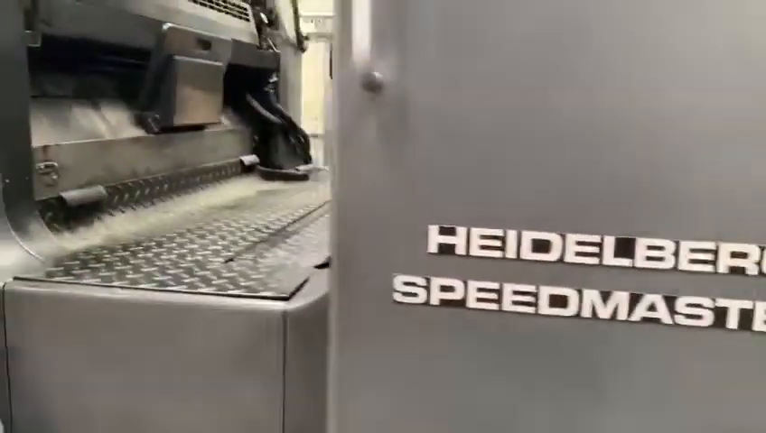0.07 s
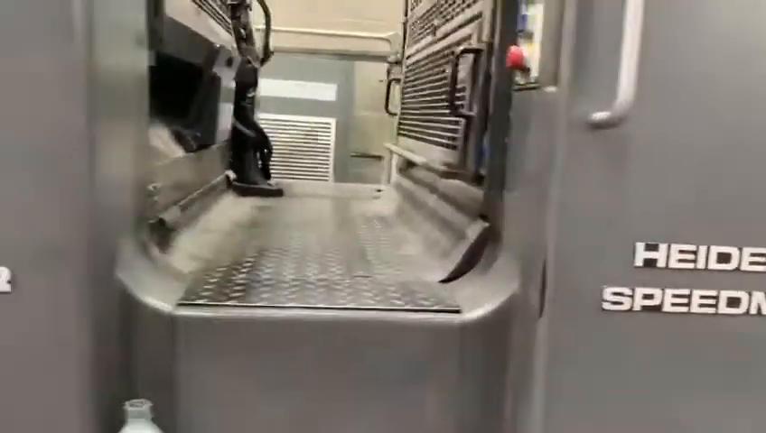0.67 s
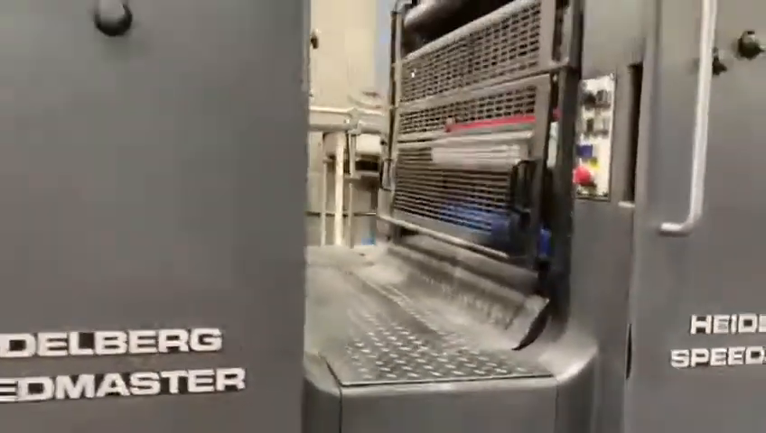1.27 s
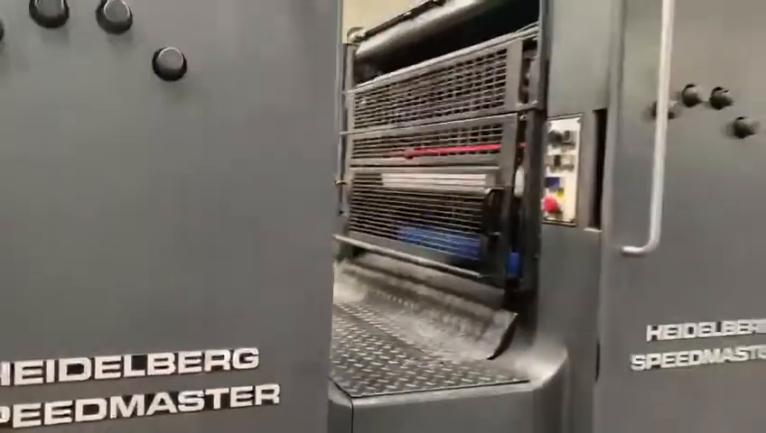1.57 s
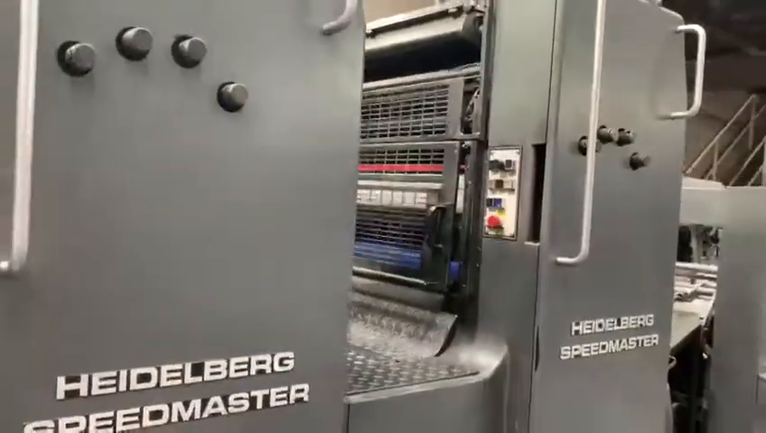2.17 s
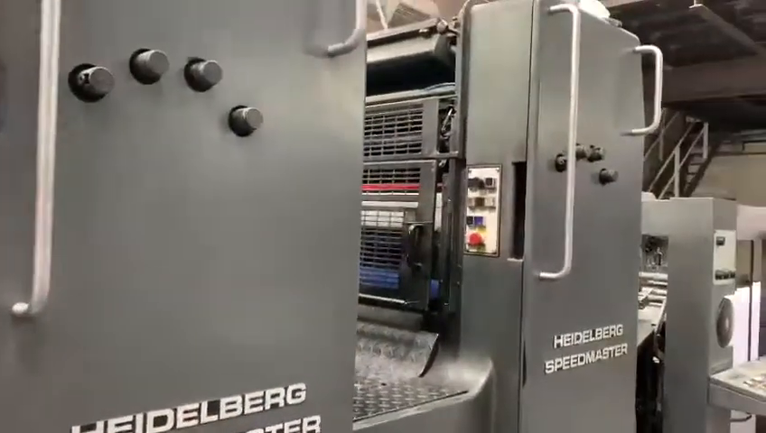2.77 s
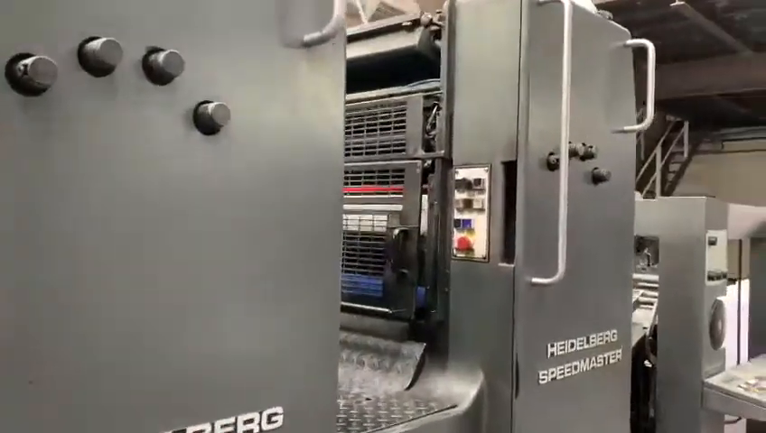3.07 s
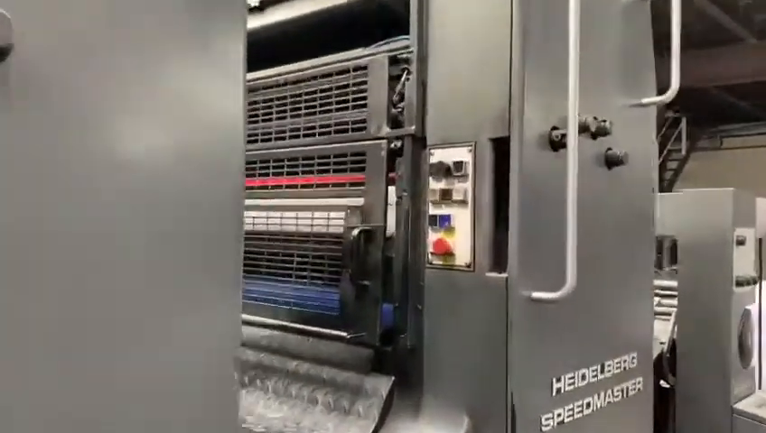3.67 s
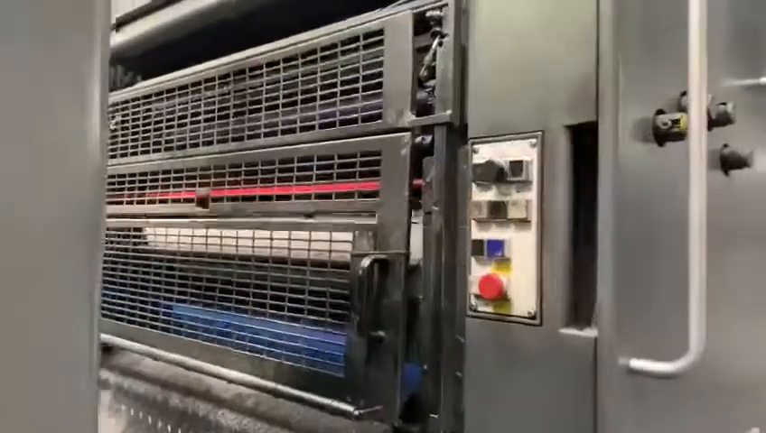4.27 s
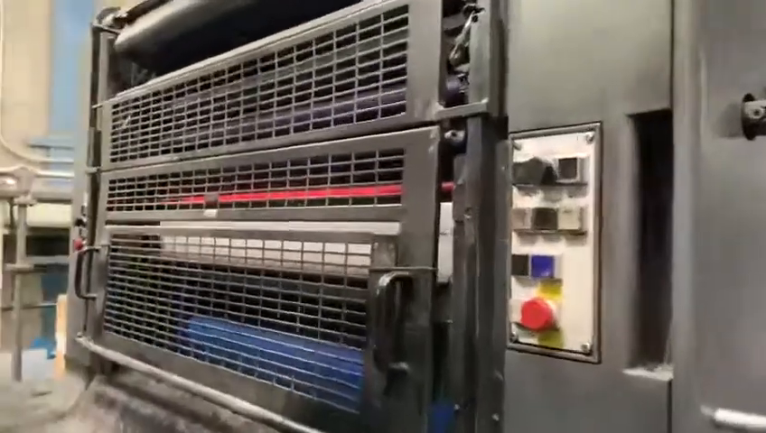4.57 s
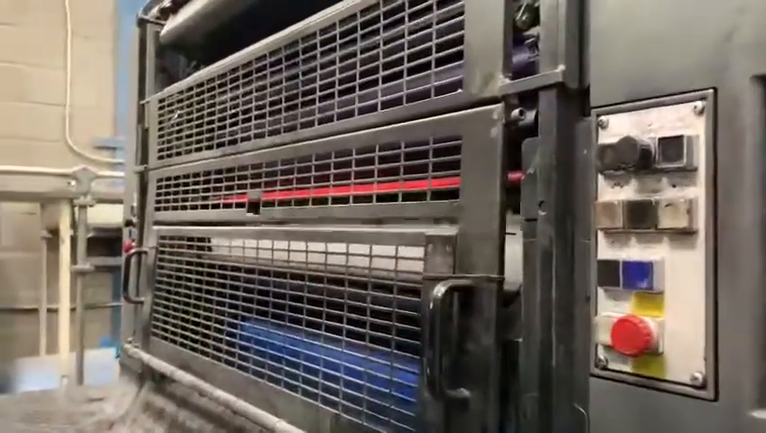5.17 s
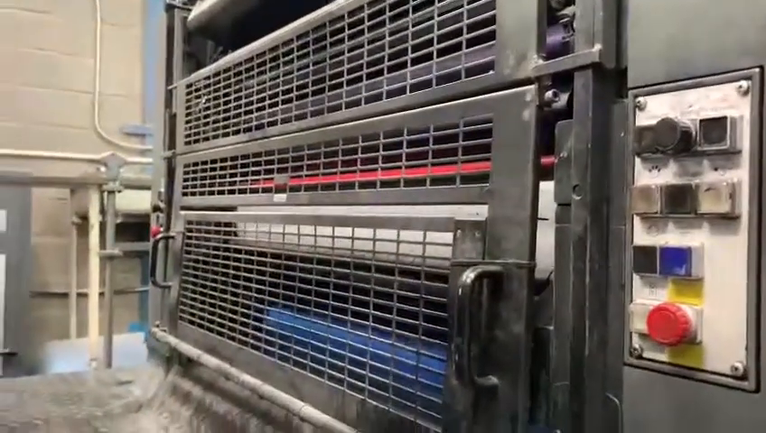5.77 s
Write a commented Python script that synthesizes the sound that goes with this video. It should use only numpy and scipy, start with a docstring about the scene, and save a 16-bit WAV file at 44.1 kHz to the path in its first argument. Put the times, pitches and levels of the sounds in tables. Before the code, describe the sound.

A large sheet-fed printing press runs in an industrial hall with a steady low roar, motor hum and hissing rollers. A little over twice a second it thumps, spits air and snaps, with metal clanks, light ticks and a faint high whine mixed in. The beat is subdued at first. As the microphone moves up to the guard, the booms, clanks and crisp snaps become much louder and clearer.

```python
"""A sheet-fed offset press runs in a hall, heard on a walk up to the guard of one printing unit.
With every sheet, a little over twice a second, a valve spits, the grippers snap and the cylinder gaps
boom; a cam lever clanks through its round every second sheet. Underneath, frame and gears roar, drive
teeth whine, inked rollers hiss and chain links tick. The side covers screen the moving parts, so these
grow louder as the open guard comes into view."""
import sys
import numpy as np
from scipy import signal
from scipy.fft import rfft, irfft, next_fast_len
from scipy.io import wavfile
from scipy.ndimage import uniform_filter1d, map_coordinates

SR = 44100
rng = np.random.default_rng(int(sys.argv[2]) if len(sys.argv) > 2 else 0)


def put_to_file(sound):
    """Save the sound as 16-bit audio at rate SR, in the file named by the first command-line argument."""
    columns = np.atleast_2d(sound).T  # one column per channel
    safe = np.clip(columns, -1, 1)
    whole_steps = np.round(safe * 32767)
    wavfile.write(sys.argv[1], SR, whole_steps.astype(np.int16))


N = 265482
TIME_S = np.arange(N) / SR

SHEET_PERIOD_S, FIRST_SNAP_S = .45, .2375
MESH_HZ, RATTLE_HZ = 170.85, 220
ROAR_GAIN_DB, WHINE_GAIN_DB, SNAP_GAIN_DB = 3, -.5, .5
RING_GAIN_DB, SCRAPE_GAIN_DB, HALL_GAIN_DB = 2.3, 1.7, -15
LOW_CUT_HZ, TOP_HZ = 42, 11900

# Noise spectra: freq_hz, density_db
RUMBLE_SPECTRUM = [(18, -36), (32, -32), (48, -7), (60, -6), (92, 1.5), (125, 2.5), (160, 1.5), (195, 3),
                   (240, 1.5), (300, 0.5), (380, -9.5), (600, -118)]
ROAR_SPECTRUM = [(180, -5.5), (350, -0.5), (480, -1.5), (650, -3.5), (900, -4.5), (1250, -9.5), (1600, -10),
                 (2100, -12), (2800, -17), (4500, -89)]
HISS_SPECTRUM = [(1400, -40), (2400, 5.5), (2850, 10), (3200, 11.5), (4500, 8.5), (5500, 4.5), (6700, 5.5),
                 (7300, 13), (7800, -52), (12000, -51)]
FIZZ_SPECTRUM = [(4000, -25), (5600, -8), (6600, -2.5), (7600, -.5), (8500, 0), (9700, 0), (10500, .5),
                 (11550, -1), (11900, -12)]
SNAP_SPECTRUM = [(2000, -18), (5000, 3.5), (7200, 11.5), (8500, 13.5), (10500, 19.5), (12000, 7)]
# Left-right likeness: freq_hz, correlation (clipped to +-1 in use)
EAR_CORRELATION = [(60, 0.99), (130, 0.97), (280, 0.8), (590, 0.11), (1100, 0.02), (1550, -0.34),
                   (2200, 0.075), (3000, -0.16), (4500, 0.19), (5400, -0.083), (6600, 0.15), (7600, -1.8)]
# Stereo balance: freq_hz, left_minus_right_db
BALANCE = [(60, -.6), (130, -.2), (250, 1), (500, 2.2), (1000, .3), (3000, .3), (5000, -1.1), (7500, 0)]
# Phase of the direct treble: freq_hz, right_lead_rad
EAR_LEAD = [(5500, -.7), (6700, .1), (7300, 1.3), (7850, 2.9), (9100, 3.35), (9600, 4.6), (10300, 6.1),
            (12000, 6.4)]
# Hall decay: freq_hz, t60_s
HALL_DECAY = [(150, 0.53), (2000, 0.15), (10000, 0.092)]
# Sound let past the covers, 0 at the guard: time_s, gain_db
EXPOSURE = [(0, -16.5), (.8, -13), (2, -15), (3.4, -13.5), (3.95, -9), (4.3, -7.5), (4.8, -2), (6.02, 0)]
# Gear roar and gear drone along the walk: time_s, level_db
ROAR_LEVELS = [(0.0, -33.5), (0.07, -32), (2.75, -30.5), (6.02, -27)]
DRONE_LEVELS = [(0, -38), (.64, -46), (.75, -31.5), (1, -31), (1.14, -42), (1.3, -36), (1.45, -41),
                (1.6, -35), (1.76, -54), (2.15, -46), (2.4, -37), (2.85, -42), (3.15, -36), (3.65, -37),
                (3.85, -54), (5, -35), (5.3, -42)]
# Swells of the strongest whine: peak_s, length_s, level_db
SQUEALS = [(1.32, .09, -52.5), (2.34, .12, -47), (2.46, .06, -50), (2.94, .09, -51.5), (3.09, .08, -52.5),
           (3.24, .1, -51.5), (3.53, .12, -46), (3.68, .08, -53), (4.97, .16, -51), (5.17, .1, -54),
           (5.65, .09, -47), (5.92, .11, -49.5)]
# Weaker whines: mesh_order, unused_db, level_db
WHINES = [(18, -65, -60), (19, -67, -65), (21, -64, -64), (22, -63, -61.5), (23, -66, -64), (30, -68, -65),
          (38, -65, -58.5), (39, -65, -58)]
# Motor and blower tones: pitch_hz, level_db, exposure_share
HUMS = [(49, -53, 0), (155.7, -37, 0.16), (242.5, -38.5, 0.12), (501, -44, 0.34), (1958, -50.5, 0.36)]
# Light strokes per sheet: after_snap_s, centre_hz, width_hz, level_db, rise_s, t60_s
STROKES = [(-.06, 3420, 3200, -44, .02, .3), (-.045, 814, 1100, -29, .02, 0.28),
           (.066, 2210, 2580, -37, .0015, 0.032), (0.146, 4000, 2420, -36, 0.02, 0.12),
           (0.168, 700, 800, -31.5, 0.0096, .2), (.268, 600, 800, -28.5, .004, 0.17)]
# Cam knocks per sheet: after_snap_s, pitch_hz, level_db, swell_s, exposure_share
CAM_THUDS = [(-.008, 150, -28, .006, .15), (.058, 220, -28, .004, 0), (.074, 98, -26, .009, .2),
             (.114, 225, -25, .005, 0), (.165, 225, -28, .007, .2), (.172, 88, -27, .016, .3),
             (.324, 160, -23.5, .007, .2)]
# Frame and lever modes: pitch_hz, level_db, t60_s
FRAME_MODES = [(97, 0, .15), (155, 0, .16), (213, -2, .16), (230, 0, .15), (246.5, 0, .18), (272, -4, .12)]
LEVER_MODES = [(505, 0, .15), (665, -1, .12), (835, -2, .12), (921, -3, .1), (1040, -3, .1), (1160, -3, .1),
               (1430, 0, .13), (1525, -1, .12), (1750, -6, .08), (1938, 2, .19), (1975, -12, .12),
               (2220, -9, .1)]
# Blows on the frame: start_s, level_db, centre_hz
FRAME_BOOMS = [(.288, -22, 155), (.314, -19, 247), (.738, -22, 155), (.764, -17.5, 258), (1.207, -18, 230),
               (1.659, -14.5, 229), (2.135, -19.5, 232), (2.587, -15, 232), (3.035, -22, 245),
               (3.49, -16, 245), (3.902, -19.5, 232), (4.35, -13, 231), (4.808, -11, 247),
               (4.907, -17.5, 97), (5.253, -15, 97), (5.264, -8.3, 247), (5.352, -21, 97), (5.705, -16, 97),
               (5.709, -9, 246), (5.802, -15.5, 97), (5.823, -17, 155)]
# Lever's rubbing contacts per two-sheet round: after_snap_s, level_db, centre_hz
LEVER_RUBS = [(-.012, -24, 680), (.027, -23.5, 560), (.065, -29, 1200), (.18, -24.5, 850),
              (.51, -27.5, 950), (.67, -30, 1300)]
# Lever hitting its stop or the frame: start_s, level_db, centre_hz, ring_offset_db
LEVER_KNOCKS = [(.246, -38, 1450, 3), (.408, -28, 600, -4), (2.048, -37, 1500, 10), (2.46, -30, 650, -4),
                (2.944, -37, 1460, 10), (4.018, -26, 640, -4), (4.205, -34.5, 1450, 5),
                (4.722, -27, 620, -5), (4.745, -24, 600, -5), (4.748, -27.5, 1800, 0),
                (4.753, -32, 1430, 8), (4.802, -31, 1180, 6), (4.94, -28.5, 1100, -2),
                (5.255, -28.5, 1020, 3), (5.59, -28, 950, -4), (5.622, -24.5, 950, -2),
                (5.637, -28, 1560, -1), (5.64, -31, 1940, 9), (5.648, -25, 850, -4),
                (5.665, -21.5, 560, -5)]
# Gripper snaps, one per sheet: level_db
SNAP_LEVELS_DB = [-39, -34, -35, -35, -37, -33, -37.5, -35, -27.5, -27.5, -24.3, -23.2, -23]


def amp(db):
    """Decibels to gain."""
    return 10 ** (np.asarray(db) / 20)


def unit(x):
    """Scale to rms 1."""
    return x / np.sqrt(np.mean(x ** 2) + 1e-20)


def along(points, hz):
    """Interpolate (freq_hz, value) points on a log axis."""
    knots_hz, values = np.transpose(points)
    return np.interp(np.log(hz + 1), np.log(knots_hz + 1), values)


def curve(points, time_s=TIME_S):
    """Interpolate (time_s, value) points."""
    return np.interp(time_s, *np.transpose(points))


def cover_db(share, time_s=TIME_S):
    """Screening by the covers; sound that bends round them follows only a share of it."""
    return share * curve(EXPOSURE, time_s)


def wobble(rate_hz):
    """Smooth random curve, rate_hz knots a second."""
    return map_coordinates(rng.standard_normal(int(N * rate_hz / SR) + 4), [TIME_S * rate_hz])


def add(track, start_s, sound):
    """Mix a sound into a stereo track."""
    start = round(start_s * SR)
    track[:, start:start + sound.shape[1]] += sound[:, :N - start]


def filtered(x, response):
    """Apply a frequency response."""
    size = next_fast_len(N + 8192)
    return irfft(rfft(x, size) * response(np.fft.rfftfreq(size, 1 / SR)), size)[..., :N]


def shape(spectrum):
    """Response of a spectrum table."""
    return lambda hz: amp(along(spectrum, hz))


def resonance(centre_hz, width_hz):
    """Response of one steep-skirted resonance."""
    return lambda hz: (hz * width_hz) ** 2 / ((centre_hz ** 2 - hz ** 2) ** 2 + (hz * width_hz) ** 2)


def ear_angle_rad(hz):
    """Left-right correlation as an angle; 0 is mono."""
    return np.arccos(np.clip(along(EAR_CORRELATION, hz), -1, 1))


def spread(pair, colour):
    """Two unrelated signals to a coloured stereo field, near mono in the bass; rms 1."""
    def response(hz):
        turn_rad = ear_angle_rad(hz) / 2
        return colour(hz) * np.array([np.cos(turn_rad), np.sin(turn_rad)])
    mid, side = filtered(pair, response)
    return unit(np.array([mid + side, mid - side]))


def rush(colour):
    """Coloured stereo noise; rms 1."""
    return spread(rng.standard_normal((2, N)), colour)


def patchy(colour, depth_db=2.1):
    """Grainy noise: narrow bands flare and fade at random; rms 1."""
    spectra = signal.stft(rng.standard_normal((2, N)), nperseg=1024)[2]
    patches = uniform_filter1d(rng.standard_normal(spectra.shape[1:]), size=5, axis=0)
    patches = uniform_filter1d(patches, size=4, axis=1)
    pair = signal.istft(spectra * amp(depth_db * unit(patches)), nperseg=1024)[1]
    return spread(pair[:, :N], colour)


def direct(x, colour):
    """Direct sound, phase-shifted between the ears; rms 1."""
    sides = np.array([[-.5], [.5]])
    return unit(filtered(x, lambda hz: colour(hz) * np.exp(1j * along(EAR_LEAD, hz) * sides)))


def tone(hz, drift_s, flutter_db):
    """Machine tone wandering at each ear in the hall's standing waves; rms 1."""
    phase = 2 * np.pi * hz * (TIME_S + drift_s)
    offset = .2 * ear_angle_rad(hz) * wobble(2.11)
    ears = [np.sin(phase + side * offset) * amp(flutter_db * wobble(5.5)) for side in (1, -1)]
    return unit(np.array(ears))


def beats(after_snap_s, level_db, share, sheets=1):
    """(start_s, level_db) of a slightly uneven blow, once per round of sheets."""
    period_s = sheets * SHEET_PERIOD_S
    starts_s = np.arange(FIRST_SNAP_S - period_s, N / SR, period_s) + after_snap_s
    starts_s = starts_s[(starts_s > 0) & (starts_s < N / SR)]
    scatter_db = .7 * rng.uniform(-1, 1, len(starts_s))
    return list(zip(starts_s, level_db + cover_db(share, starts_s) + scatter_db))


def blows(events, rise_s, t60_s):
    """Power-summed envelope of (start_s, level_db) blows."""
    t = np.arange(SR // 2) / SR
    blow = (1 - np.exp(-t / rise_s)) * amp(-60 * t / t60_s)
    blow /= blow.max()
    return np.sqrt(sum(np.interp(TIME_S - s, t, amp(db) * blow, left=0, right=0) ** 2
                       for s, db in events))


def favouring(modes, centre_hz, db_per_octave):
    """Modes as a blow excites them: weaker away from centre_hz."""
    return [(hz, db - db_per_octave * abs(np.log2(hz / centre_hz)), t60_s) for hz, db, t60_s in modes]


def ring(modes, scatter_db, rise_s):
    """Struck metal: decaying modes with random strengths and per-ear phases."""
    t = np.arange(SR // 2) / SR
    out, power = np.zeros((2, len(t))), 0
    for hz, db, t60_s in modes:
        gain = amp(db + scatter_db * rng.standard_normal())
        phase = rng.uniform(0, 2 * np.pi) + .45 * ear_angle_rad(hz) * rng.standard_normal((2, 1))
        out += gain * np.sin(2 * np.pi * hz * t + phase) * amp(-60 * t / t60_s)
        power += gain ** 2 / 2
    return out * (1 - np.exp(-t / rise_s)) / np.sqrt(power)


def hall(x):
    """Diffuse reverberation, dying faster in the treble."""
    hz, t, spectra = signal.stft(rng.standard_normal((2, SR)), SR, nperseg=256)
    decay = amp(-60 * t / along(HALL_DECAY, hz)[:, None])
    tail = signal.istft(spectra * decay, SR, nperseg=256)[1]
    return signal.fftconvolve(x, tail / np.linalg.norm(tail[0]), axes=1)[:, :N]


def frame_rumble(repeat_share=.25):
    """The frame rumbles; part of the power repeats with each cylinder turn."""
    turn = rng.standard_normal((2, round(SHEET_PERIOD_S * SR)))
    repeating = np.sqrt(repeat_share) * turn[:, np.arange(N) % turn.shape[1]]
    fresh = np.sqrt(1 - repeat_share) * rng.standard_normal((2, N))
    return amp(-25.5 + cover_db(.31)) * spread(repeating + fresh, shape(RUMBLE_SPECTRUM))


def gear_roar():
    """The gear train roars, nearer with each step."""
    level_db = ROAR_GAIN_DB + curve(ROAR_LEVELS) + .7 * wobble(40)
    return amp(level_db) * patchy(shape(ROAR_SPECTRUM))


def roller_hiss():
    """Rollers hiss, roughened by bearings and chains."""
    level_db = -36 + cover_db(.18) + wobble(28)
    roughness = unit(amp(1.2 * wobble(RATTLE_HZ)))
    return amp(level_db) * roughness * patchy(shape(HISS_SPECTRUM))


def ink_fizz():
    """Tacky ink splits between the rollers in tiny crackles."""
    crackles = rng.standard_normal(N) * amp(2.8 * rng.standard_normal(N))
    level_db = -35 + cover_db(.38) + 1.3 * wobble(21.76)
    return amp(level_db) * direct(crackles, shape(FIZZ_SPECTRUM))


def gear_tones():
    """Teeth drone, whine and briefly squeal at multiples of the mesh rate."""
    drift_s = 6e-5 * wobble(9.5)  # uneven drive speed
    drone = amp(curve(DRONE_LEVELS)) * tone(2 * MESH_HZ, drift_s, flutter_db=0)
    squeals = sum(amp(db) * np.exp(-2 * ((TIME_S - peak_s) / length_s) ** 2)
                  for peak_s, length_s, db in SQUEALS)
    whine = np.hypot(amp(-57.5), squeals) * tone(20 * MESH_HZ, drift_s, flutter_db=.7)
    for order, _, db in WHINES:
        whine += amp(WHINE_GAIN_DB + db) * tone(order * MESH_HZ, drift_s, flutter_db=4)
    return drone + whine


def motor_hum():
    """Motor and blowers hum, each tone drifting on its own."""
    return sum(amp(db + cover_db(share)) * tone(hz, .23 / hz * wobble(14), flutter_db=3.5)
               for hz, db, share in HUMS)


def chain_ticks(count=300):
    """Chain links and loose guards tick on thin steel; higher ticks are weaker."""
    out = np.zeros((2, N))
    for when, force, pitch in rng.uniform(size=(count, 3)):
        hz = 950 * 5 ** pitch
        modes = [(hz, 0, .05), (hz * np.sqrt(2), -4, .035)]
        level_db = -43 + 8 * force - 6 * pitch
        add(out, when * N / SR, amp(level_db) * ring(modes, scatter_db=3, rise_s=.0007))
    return out


def light_strokes():
    """The same soft noise bursts recur with every sheet."""
    return sum(blows(beats(after_s, db, share=.45), rise_s, t60_s) * rush(resonance(hz, width_hz))
               for after_s, hz, width_hz, db, rise_s, t60_s in STROKES)


def air_valve(pass_s=3.1, nearest_m=.81, walk_m_per_s=.42):
    """Suction air sputters out just before each snap, loudest where the walk passes the valve."""
    distance_m = np.hypot(nearest_m, walk_m_per_s * (TIME_S - pass_s))
    spits = blows(beats(after_snap_s=-.019, level_db=-36.3, share=0), rise_s=.003, t60_s=.09)
    sputter = unit(amp(3 * wobble(RATTLE_HZ) + 1.5 * wobble(1 / SHEET_PERIOD_S)))
    return nearest_m / distance_m * spits * sputter * rush(resonance(4530, 820))


def cam_thuds():
    """Cams knock dully through each cycle, varying in force and pitch."""
    t = np.arange(SR // 4) / SR
    out = np.zeros((2, N))
    for after_s, hz, level_db, swell_s, share in CAM_THUDS:
        envelope = (t / swell_s * np.exp(1 - t / swell_s)) ** 2
        for start_s, db in beats(after_s, level_db, share):
            force, pitch = rng.standard_normal(2)
            thud = envelope * np.sin(2 * np.pi * hz * (1 + .04 * pitch) * t)
            add(out, start_s, amp(db + 1.5 * force) * thud[None])
    return out


def cylinder_booms():
    """The heavy frame booms as the cylinder gaps pass; at the guard the cams shake it too."""
    out = np.zeros((2, N))
    for start_s, db, centre_hz in FRAME_BOOMS:
        modes = favouring(FRAME_MODES, centre_hz, db_per_octave=110)
        add(out, start_s, amp(db) * ring(modes, scatter_db=1, rise_s=.012))
    return out


def cam_lever(rub_damping_db=-1.5):
    """The lever rubs through its round and at times knocks; each contact scrapes and rings."""
    t = np.arange(SR // 2) / SR
    bins_hz = np.fft.rfftfreq(len(t), 1 / SR)
    contact = (1 - np.exp(-t / .006)) * amp(-60 * t / .14)
    rubs = [(start_s, db, hz, rub_damping_db) for after_s, level_db, hz in LEVER_RUBS
            for start_s, db in beats(after_s, level_db, share=.72, sheets=2)]
    rattle = unit(amp(2 * wobble(RATTLE_HZ)))
    rings, scrapes = np.zeros((2, 2, N))
    for start_s, db, centre_hz, ring_offset_db in rubs + LEVER_KNOCKS:
        colour = resonance(centre_hz, width_hz=.7 * centre_hz)(bins_hz)
        friction = unit(irfft(rfft(rng.standard_normal((2, len(t)))) * colour, len(t)))
        add(scrapes, start_s, amp(db) * contact * friction)
        modes = favouring(LEVER_MODES, centre_hz, db_per_octave=32)
        add(rings, start_s, amp(db + ring_offset_db) * ring(modes, scatter_db=1.5, rise_s=.005))
    return amp(RING_GAIN_DB) * rings + amp(SCRAPE_GAIN_DB) * rattle * scrapes


def grippers(closing_s=.005):
    """Each sheet slides to the stops and swishes into a row of fingers, which snap shut."""
    sheets = [(FIRST_SNAP_S + k * SHEET_PERIOD_S, db) for k, db in enumerate(SNAP_LEVELS_DB)]
    fingers = amp(2.9 * wobble(700)) * rng.standard_normal(N)
    closings = [(s + side * closing_s / 2, db) for s, db in sheets for side in (-1, 1)]
    snaps = amp(SNAP_GAIN_DB) * blows(closings, rise_s=.002, t60_s=.06) / np.sqrt(2)
    swish = blows([(s - .018, db - 11.5) for s, db in sheets], rise_s=.015, t60_s=.18)
    slide = blows([(s - .08, -42.5) for s, _ in sheets], rise_s=.03, t60_s=.22)
    paper = np.hypot(swish, slide) * direct(rng.standard_normal(N), shape(FIZZ_SPECTRUM))
    return snaps * direct(fingers, shape(SNAP_SPECTRUM)) + paper


def scene():
    """Running noise, the beat of the sheets with its reverberation, and the grippers."""
    beat = cam_lever() + cam_thuds() + cylinder_booms() + air_valve() + light_strokes() + chain_ticks()
    running = frame_rumble() + gear_roar() + roller_hiss() + ink_fizz() + gear_tones() + motor_hum()
    press = running + beat + grippers() + amp(HALL_GAIN_DB) * hall(beat)
    return filtered(press, lambda hz: amp(along(BALANCE, hz) * np.array([[.5], [-.5]])))


def record(dry):
    """Third-order low cut and a hard band limit."""
    return filtered(dry, lambda hz: (hz < TOP_HZ) * hz ** 3 / np.hypot(hz ** 3, LOW_CUT_HZ ** 3))


dry = scene()
out = record(dry)
put_to_file(out)
```